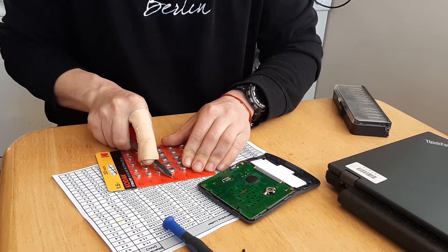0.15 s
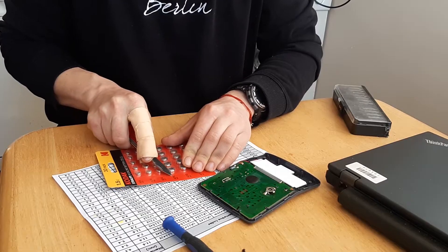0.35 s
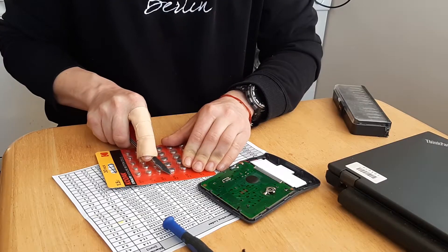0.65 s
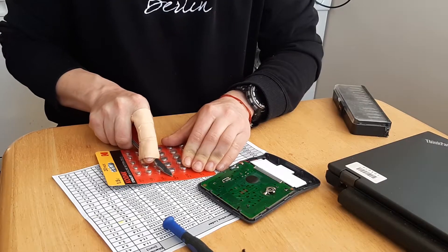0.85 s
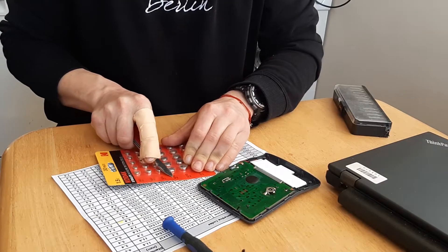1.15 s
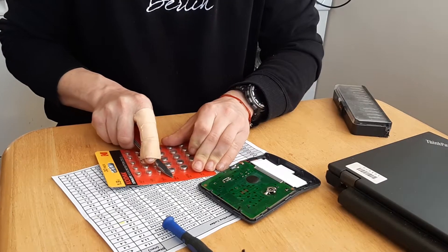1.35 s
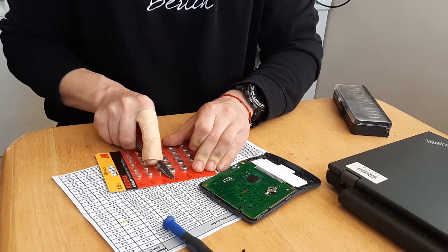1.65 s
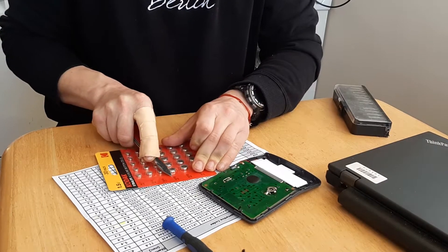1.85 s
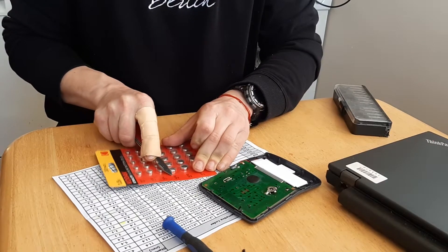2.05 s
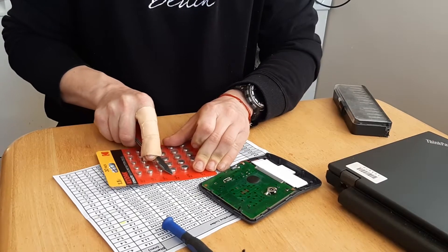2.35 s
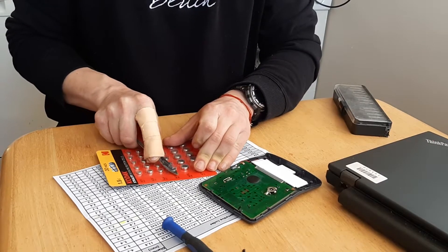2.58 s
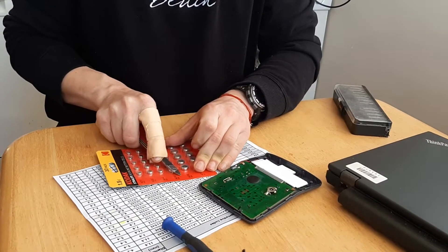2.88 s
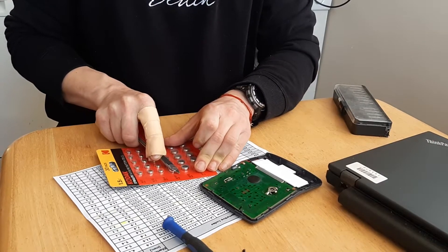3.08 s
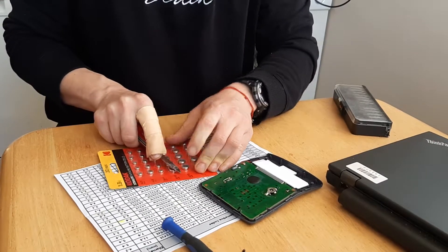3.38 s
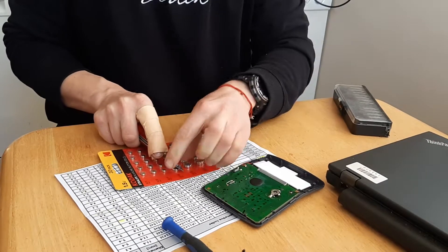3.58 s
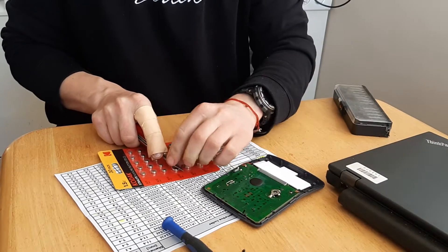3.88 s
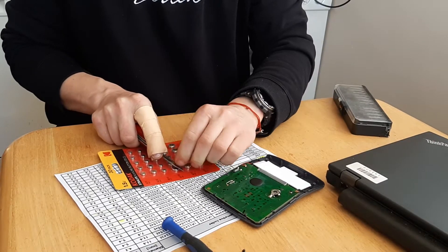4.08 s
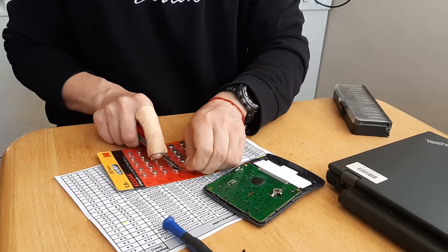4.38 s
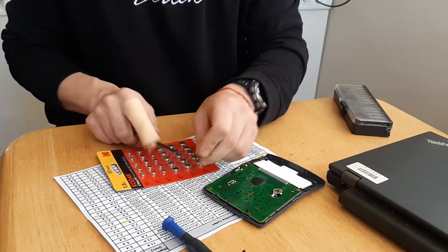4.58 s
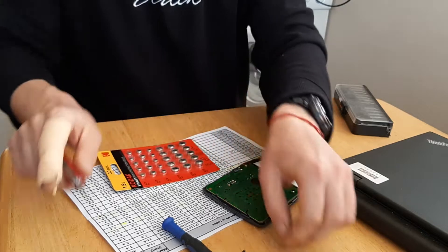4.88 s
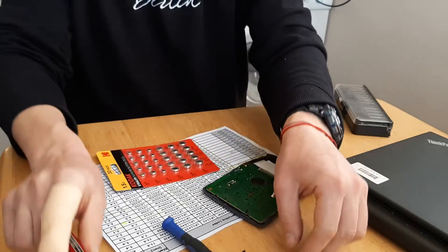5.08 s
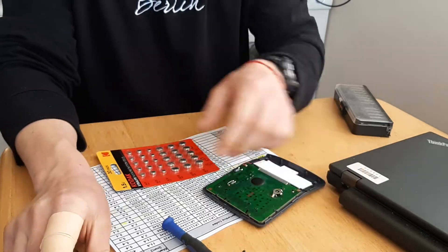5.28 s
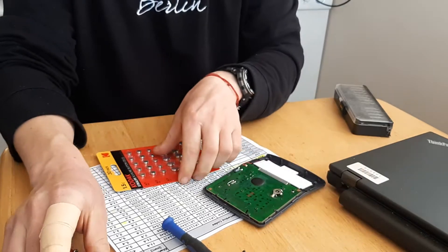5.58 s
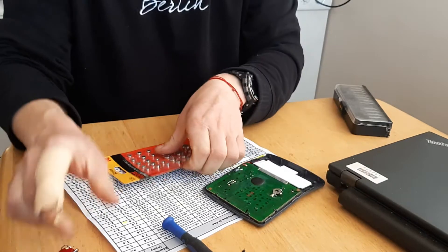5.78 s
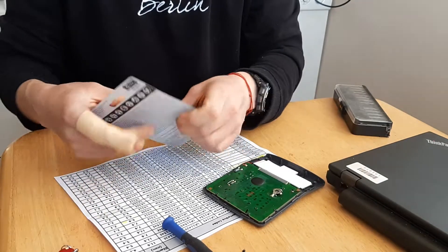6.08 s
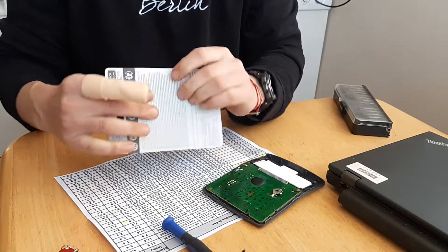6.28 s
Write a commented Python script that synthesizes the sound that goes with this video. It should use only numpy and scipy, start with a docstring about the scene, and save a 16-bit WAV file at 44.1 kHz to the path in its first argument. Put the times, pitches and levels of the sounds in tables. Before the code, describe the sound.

In a bare room, rasping metal on stiff plastic builds to a sharp crack, then a pop, tiny ticks, wooden thumps and a papery drag.

```python
"""A wooden desk in a bare, ringing room, heard by a camera's two microphones from slightly left of centre.
Metal tweezers scratch at a plastic blister card (stick-slip clicks and hiss) until the blister snaps (short coloured
bursts) and a button cell comes free. The cell ticks (brief dying sines), tweezers and hand knock on the desk (dulled
bursts and a humming top), sleeve and card rub and the card slides off its paper (more stick-slip), over room air,
a thin whine and cloth. Table levels are at the source, before the gains of straight path and room."""
import sys
import numpy as np
from scipy import signal
from scipy.fft import rfft, irfft
from scipy.io import wavfile

SR = 44100
rng = np.random.default_rng(int(sys.argv[2]) if len(sys.argv) > 2 else 0)


def log_audio(samples):
    """Write samples as a 16-bit WAV file to the path given in sys.argv[1]."""
    # one column per channel
    frames = np.atleast_2d(samples).T
    # limit to full scale, then quantise
    limited = np.clip(frames, -1, 1)
    pcm = np.round(limited * 32767).astype(np.int16)
    wavfile.write(sys.argv[1], SR, pcm)


N = 283713
TIME = np.arange(N) / SR

FIRM_DB, STROKE_S = -35, .028  # level of a firm stroke, and the sum of its rise and fall time constants
LINGER_DB = 24  # a stroke this much lighter takes twice as long
FIRM_TREBLE_DB, FIRM_BODY_DB, BODY_PER_DB = -1.5, 0, 0.08  # colour of a firm stroke; lighter ones sound thinner


def scrape(peak_s, level_db, swell):
    """One stroke: firm ones are short and full, light ones long and thin."""
    length = STROKE_S * 2 ** ((FIRM_DB - level_db) / LINGER_DB)
    swell = np.clip(swell, .02, .98)
    body_db = FIRM_BODY_DB + BODY_PER_DB * (level_db - FIRM_DB)
    return peak_s, level_db, swell * length, (1 - swell) * length, FIRM_TREBLE_DB, body_db


# Strokes of the tweezer tip on the blister, and at 5.347 a faint rub as sleeve or hand lands:
# peak_s, level_db, swell_share (part of the stroke spent rising, 0-1)
SCRAPES = [(0.004, -37.5, 0.89), (0.32, -58, 0.66), (0.48, -54, 0.68), (0.561, -53, 0.02),
           (0.667, -44.5, 0.71), (0.813, -46.5, 0.44), (0.926, -45.5, 0.18), (0.952, -44, .45),
           (1.1, -36, 0.86), (1.255, -40, 0.43), (1.31, -44.5, .5), (1.375, -42, 0.66), (1.514, -36, .15),
           (1.655, -31.5, 0.26), (1.822, -35, 0.46), (1.958, -35, 0.62), (2.095, -37, 0.77),
           (2.226, -31.5, .25), (2.385, -34, .7), (2.96, -44.5, 0.4), (3.436, -37.5, 0.18),
           (3.475, -45.5, 0.4), (4.202, -54, .02), (4.56, -57.5, .45), (4.811, -64, 0.02),
           (5.347, -58, 0.17)]
# Colour of the scratched plastic, also given to the faint rub: pitch_hz, level_db
BLISTER_COLOUR = [(60, -44), (200, -11), (350, -9.5), (800, -8.5), (1200, -5), (1800, -7.5), (2400, -2),
                  (3500, -0.5), (5000, -2), (6300, -3.5), (7300, -15.5), (10000, -16.5), (13000, -20),
                  (16000, -18.5)]
# The blister crinkles more and more until it gives way
GIVE_S, STRAIN_DB, STRAIN_DB_PER_S = 2.39, -52.5, 5
GRIP_S, GRIP_RISE_S = 0.47, .6  # the tip finds its hold and takes up the strain


def scraping():
    """The tip slips and sticks along the blister, which crinkles under strain; later sleeve or hand rubs faintly."""
    strokes = [scrape(*row) for row in SCRAPES]
    rasp = friction(strokes, BLISTER_COLOUR, slips_per_s=550, spread_db=4, hiss=0.17)
    grip = np.clip((TIME - GRIP_S) / GRIP_RISE_S, 0, 1) * (TIME < GIVE_S)
    strain = grip * amp(STRAIN_DB + STRAIN_DB_PER_S * (TIME - GIVE_S))
    crinkle = ring(slips(N, per_s=98, spread_db=4.0) * strain, colour(BLISTER_COLOUR))
    return heard(rasp + crinkle, -3.4, 0.71)


# Plastic snapping: start_s, level_db (energy), room_db (room against straight path)
SNAPS = [(0.949, -20.5, 0.5), (1.095, -17, 8), (1.513, -19.5, 4), (1.663, -13.5, 8.5), (2.207, -17, -2.5),
         (2.256, -22.5, -1), (2.373, -20.5, -1.5), (2.3901, 7.5, 2), (2.3915, -8.5, 1), (2.3987, -2.5, 2),
         (2.401, 0.5, 6.5), (2.4083, -4, -2.5), (2.5, -20, -24), (2.635, -31, -5), (2.724, -42, -11),
         (2.957, -18, -5), (3.63, -33.5, 0.5)]
# Colour of the snapping plastic: pitch_hz, level_db
SNAP_COLOUR = [(60, -33), (300, -17), (600, -13), (1900, -10), (2600, 0), (3300, -2), (4800, -.5),
               (6100, -5), (7400, -14), (9500, -11), (13300, -8), (16000, -10)]
# The cell springing out of its pocket: start_s, level_db (energy), room_db
POPS = [(4.3575, 3, 1.5), (4.368, -12, -2), (4.377, -24, 5)]
# Colour of the emptied pocket: pitch_hz, level_db
POCKET_COLOUR = [(60, -28), (300, -13), (550, -7), (900, -3), (1300, -12), (1900, -14), (3000, -4),
                 (4300, 1), (5900, 1), (7400, -15), (16000, -12)]
BRIGHT_PER_DB = .5  # dB of treble gained for each dB of snap energy


def snapping(snaps, spectrum, treble_db):
    """The blister buckles and tears, brighter the harder; snaps that face away are heard mostly through the room."""
    near, far = np.zeros(N), np.zeros(N)
    for start_s, level_db, room_db in snaps:
        plastic = colour(spectrum, treble_db + BRIGHT_PER_DB * level_db)
        snap = amp(level_db) * signal.fftconvolve(contact(fall=.001, grit=.5), plastic)
        add(near, start_s, snap)
        add(far, start_s, amp(room_db) * snap)
    return direct(near) + room(far)


# Hands bearing down hard on the card: peak_s, level_db
PUSHES = [(0.024, -46.5), (1.29, -48), (1.61, -45), (1.833, -43), (2.104, -37), (2.416, -44), (3.98, -62),
          (4.371, -49.5), (5.35, -53.5), (5.6, -45)]
# Colour of the dull thud: pitch_hz, level_db
THUD_COLOUR = [(25, -29.5), (50, -18.5), (75, -4), (130, 1), (190, -1), (260, -19), (450, -19.5),
               (900, -38.5), (3000, -96)]
PUSH_RISE_S, PUSH_FALL_S = .018, .027
LEAN_DB, LEAN_LAG_S = -21, .012  # every stroke in SCRAPES also leans on card or desk, this much weaker and later


def pushing():
    """Low noise thuds as the hands bear down on card and desk, and a light one under every stroke in SCRAPES."""
    out = np.zeros(N)
    leans = [(peak_s + LEAN_LAG_S, level_db + LEAN_DB) for peak_s, level_db, _ in SCRAPES]
    for peak_s, level_db in list(PUSHES) + leans:
        start_s, force = stroke(peak_s, PUSH_RISE_S, PUSH_FALL_S)
        thud = ring(rng.standard_normal(len(force)), colour(THUD_COLOUR))
        add(out, start_s, amp(level_db) * under(force, thud))
    return heard(out, 0.0064, 0.067)


# The button cell touching tweezers and desk: start_s, level_db (energy)
TICKS = [(4.5239, -19.5), (4.9106, -31), (4.9183, -25), (4.9621, -35.5), (4.971, -24), (5.014, -31.5)]
# Ringing modes of the cell: pitch_hz, level_db, t60_s
CELL_MODES = [(3330, 0, .012), (5700, 0, .0025), (11400, 1, .0012), (13500, -4, .001)]


def ticking():
    """The small metal cell rings very briefly at each touch."""
    force, body = np.zeros(N), modes(CELL_MODES)
    for start_s, level_db in TICKS:
        add(force, start_s, amp(level_db) * contact(fall=0.00083, grit=0.55))
    ringing = ring(force, body / np.linalg.norm(body))
    return heard(ringing + 0.052 * force, 0, -0.5)


# Blows on the desk: start_s, level_db (energy), corner_hz (higher is harder), ring_db (drive of the desk top)
KNOCKS = [(0.003, -14, 550, -46), (0.017, -19, 490, -39.5), (0.431, -37.5, 400, -53.5),
          (0.749, -40, 400, -54), (4.358, -11.5, 2500, -58), (5.347, -37, 2513, -51),
          (5.41, -7.5, 900, -33), (5.443, -9.5, 700, -48), (5.497, -18, 500, -38.5),
          (5.563, -9.5, 5000, -49), (5.571, 1, 2800, -26.5), (5.578, -4, 1500, -31.5),
          (5.605, 0.5, 900, -25), (5.626, -10, 590, -52)]
# Colour of the clack, before the corner dulls it: pitch_hz, level_db
WOOD_COLOUR = [(40, -32), (130, -7), (330, -5), (470, -1), (700, -3), (900, 0), (1500, 1), (2200, 0),
               (3000, -6), (5500, -11), (7400, -22), (16000, -12)]
# Humming modes of the desk top: pitch_hz, level_db, t60_s
DESK_MODES = [(184.5, -1, 0.6), (254, -10.5, 0.48), (377, -55, 0.13), (512, -53, 0.073), (573, -11, 0.3),
              (611.3, -9.5, 0.25), (694, -12.5, 0.29), (902, -13, 0.36), (1200, -46, 0.15),
              (1524, -16.5, 0.26)]


def knocking():
    """Each blow gives a wooden clack and sets the desk top humming."""
    clack, push = np.zeros(N), np.zeros(N)
    for start_s, level_db, corner_hz, ring_db in KNOCKS:
        wood = colour(WOOD_COLOUR, corner_hz=corner_hz)
        add(clack, start_s, amp(level_db) * signal.fftconvolve(contact(fall=0.0013, grit=0.99), wood))
        add(push, start_s, amp([ring_db]))  # a single-sample push
    onset = 1 - np.exp(-TIME[:SR] / 0.0036)
    hum = ring(push, modes(DESK_MODES) * onset)
    return heard(clack, -3.5, 0.48) + hum * amp([[-1.2], [.6]])


# Tweezers clattering on card and desk: start_s, level_db (energy)
CLATTER = [(0.004, -14.5), (5.4096, -5), (5.414, -22), (5.437, -35), (5.465, -25), (5.57, -10)]
# Colour of the tweezers: pitch_hz, level_db
TWEEZERS_COLOUR = [(100, -28), (900, -6), (1800, -9), (2600, 0), (3500, -3), (4700, 1), (5900, -2),
                   (7400, -27), (16000, -23)]


def clattering():
    """The tweezers strike card and desk: gritty contacts coloured by the metal."""
    force = np.zeros(N)
    for start_s, level_db in CLATTER:
        add(force, start_s, amp(level_db) * contact(fall=0.0024, grit=0.7))
    return heard(ring(force, colour(TWEEZERS_COLOUR)), -0.7, 2.6)


# Light rubs of sleeve and card: a sleeve rustle, soft card taps, then card edges catching on the paper:
# peak_s, level_db, treble_db
RUBS = [(4.695, -57, 0), (5.864, -42, -7), (5.941, -42.5, -7), (5.96, -50.5, -7), (6.105, -29.5, -1),
        (6.157, -30, -3), (6.272, -26.5, -1), (6.315, -34.5, 2), (6.35, -34, -5), (6.415, -33, -13)]
# Colour shared by the rubs and the drag: pitch_hz, level_db
CARD_COLOUR = [(80, -29), (200, -19), (330, -2), (480, -5), (650, -3), (1150, -0.5), (1600, -2.5),
               (3100, -1.5), (5000, -4.5), (6300, -7), (7400, -20), (16000, -20)]
RUB_RISE_S, RUB_FALL_S, RUB_BODY_DB = .003, .013, 3.5
DRAG_S, DRAG_RISE_S, DRAG_FALL_S, DRAG_DB = 6.125, .012, .2, -36  # the long pull of the card off the paper


def sliding():
    """A sleeve rustles, the card taps softly, then catches on the paper and is dragged off it: all as stick-slip."""
    strokes = [(peak_s, level_db, RUB_RISE_S, RUB_FALL_S, treble_db, RUB_BODY_DB)
               for peak_s, level_db, treble_db in RUBS]
    strokes.append((DRAG_S, DRAG_DB, DRAG_RISE_S, DRAG_FALL_S, 0, 0))
    return heard(friction(strokes, CARD_COLOUR, slips_per_s=800, spread_db=4.5, hiss=0.22), 1.0, 1.0)


# Sleeves brushing as the arms move: peak_s, level_db, swell_s (time constant of rise and of fall)
BRUSHES = [(1.2, -67.5, 1), (3.98, -70.5, 0.22), (4.27, -64, 0.073), (5.25, -65.5, 0.25)]
# Colour of the cloth: pitch_hz, level_db
CLOTH_COLOUR = [(60, -20), (185, 0), (280, -10), (620, -8), (850, -12), (1180, -7), (1500, -22),
                (4000, -30), (8000, -45)]


def brushing():
    """Cloth noise swells and fades with each arm movement, heard only through the room."""
    motion = sum(amp(level_db) * np.exp(-abs(TIME - peak_s) / swell_s) for peak_s, level_db, swell_s in BRUSHES)
    return room(ring(rng.standard_normal(N), colour(CLOTH_COLOUR)) * motion)


WHINE_HZ, WHINE_DB, WHINE_WIDTH_HZ = 2423, -86, 10


def whining():
    """A thin steady sine whose level wavers at random, separately at each microphone."""
    smoothing = [1, -np.exp(-np.pi * WHINE_WIDTH_HZ / SR)]
    waver = evened(signal.lfilter([1], smoothing, rng.standard_normal((2, N))))
    return amp(WHINE_DB) * evened((1 + 0.41 * waver) * np.sin(2 * np.pi * WHINE_HZ * TIME))


# Colour of the still room air: pitch_hz, level_db
AIR_COLOUR = [(25, -9.5), (130, 5.5), (200, -3), (300, -11), (600, -12), (1200, -14.5), (1800, -20.5),
              (5500, -12.5), (7500, -24.5), (10000, -16), (16000, -18)]
AIR_DB = -71


def room_air():
    """Steady coloured noise reaching the microphones from all sides."""
    noise = [ring(rng.standard_normal(N), colour(AIR_COLOUR)) for _ in range(2)]
    return amp(AIR_DB) * diffuse(np.array(noise))


MIC_GAP_M = 0.18


def diffuse(pair):
    """Sound from all sides: the two microphones agree only on long waves."""
    a, b = rfft(pair)
    same = np.sinc(2 * np.fft.rfftfreq(pair.shape[1], 1 / SR) * MIC_GAP_M / 343)  # 343 m/s
    return irfft([a, same * a + np.sqrt(1 - same ** 2) * b], pair.shape[1])


LAG_SAMPLES = 4  # the right microphone hears the desk this much later


def direct(x, right_db=-3.5):
    """The straight path reaches the left microphone first, and louder."""
    return np.array([x, amp(right_db) * np.pad(x, (LAG_SAMPLES, 0))[:N]])


# Decay of the bare room: pitch_hz, t60_s
ROOM_DECAY = [(100, .37), (400, .41), (1000, .43), (2800, .45), (5000, .44), (8000, .37), (15000, .28)]


def room(x, build=0.0012, density=.25):
    """Reflections swell within milliseconds and grow denser, and each band dies at its own speed."""
    crowding = density + 4 * TIME[:SR]
    taps = rng.standard_normal((2, SR)) * (rng.random(SR) < crowding)
    hz, t, bands = signal.stft(diffuse(taps), SR, nperseg=256)
    decay = amp(-60 * t / read(ROOM_DECAY, hz)[:, None])
    tail = signal.istft(bands * decay, SR, nperseg=256)[1][:, :SR]
    # Sparse early taps are raised to keep the level even
    tail = tail * (1 - np.exp(-TIME[:SR] / build)) / np.sqrt(np.minimum(crowding, 1))
    return signal.oaconvolve(x[None], tail / np.linalg.norm(tail[0]), axes=1)[:, :N]


def heard(x, direct_db, room_db):
    """Straight path plus room."""
    return amp(direct_db) * direct(x) + amp(room_db) * room(x)


def friction(strokes, spectrum, slips_per_s, spread_db, hiss):
    """Slips over a fine hiss, under each stroke (peak_s, level_db, rise_s, fall_s, treble_db, body_db)."""
    out = np.zeros(N)
    for peak_s, level_db, rise_s, fall_s, treble_db, body_db in strokes:
        start_s, force = stroke(peak_s, rise_s, fall_s)
        drive = slips(len(force), slips_per_s, spread_db) + hiss * rng.standard_normal(len(force))
        rub = signal.fftconvolve(under(force, drive), colour(spectrum, treble_db, body_db))
        add(out, start_s, amp(level_db) * rub)
    return out


def slips(size, per_s, spread_db):
    """Stick and slip: tiny clicks of uneven size and sign, rms 1."""
    height = amp(spread_db * np.minimum(rng.exponential(1, size), 3)) * rng.choice([-1, 1], size)
    return evened(height * (rng.random(size) < per_s / SR))


def stroke(peak_s, rise_s, fall_s):
    """Start time and force of a stroke that swells exponentially up to its peak and lets go."""
    t = np.arange(max(peak_s - 5 * rise_s, 0), peak_s + 5 * fall_s, 1 / SR) - peak_s
    return peak_s + t[0], np.exp(np.minimum(t / rise_s, -t / fall_s))


def under(force, drive):
    """Shapes a random drive by a force, keeping the energy of the force."""
    return evened(force * drive) * np.sqrt(np.mean(force ** 2))


def contact(fall, grit):
    """One blow of energy 1: a sharp push, then a moment of chatter."""
    t = TIME[:SR // 20]
    chatter = rng.standard_normal(len(t)) * np.exp(-t / fall)
    force = grit * chatter / np.linalg.norm(chatter)
    force[0] = 1
    return force / np.linalg.norm(force)


def modes(table):
    """Sum of dying sines."""
    t = TIME[:SR]
    return sum(amp(level_db - 60 * t / t60_s) * np.sin(2 * np.pi * pitch_hz * t)
               for pitch_hz, level_db, t60_s in table)


def colour(points, treble_db=0, body_db=0, corner_hz=None, size=4096):
    """Causal response of energy 1 with the given spectrum, shelved at both ends or dulled above a corner."""
    hz = abs(np.fft.fftfreq(size, 1 / SR))
    treble = treble_db / (1 + (7000 / (hz + 1)) ** 6)
    body = body_db / (1 + (hz / 1600) ** 4)
    db = read(points, hz) + treble + body
    if corner_hz:
        db = db - 10 * np.log10(1 + (hz / corner_hz) ** 2)
    log_gain = np.log(amp(np.maximum(db, -100)))
    minimum_phase = np.exp(signal.hilbert(log_gain).conj())
    response = np.fft.ifft(minimum_phase).real[:size // 2]
    return response / np.linalg.norm(response)


def ring(x, response):
    """Plays x through a response."""
    return signal.oaconvolve(x, response)[:len(x)]


def read(points, hz):
    """Joins (pitch_hz, value) points on a log-frequency axis."""
    f, value = np.transpose(points)
    return np.interp(np.log(hz + 1), np.log(f + 1), value)


def amp(db):
    """Decibels to gain."""
    return 10 ** (np.asarray(db) / 20)


def evened(x):
    """Scales to rms 1."""
    return x / np.sqrt(np.mean(x ** 2) + 1e-20)


def add(mix, start_s, sound):
    """Mixes a sound in at its start time."""
    part = mix[max(round(start_s * SR), 0):][:len(sound)]
    part += sound[:len(part)]


def scene():
    """Everything at the desk and the room behind it, slightly left of centre."""
    pops = snapping(POPS, POCKET_COLOUR, treble_db=4)
    prying = scraping() + snapping(SNAPS, SNAP_COLOUR, treble_db=0.0) + pops + pushing()
    clearing = ticking() + knocking() + clattering() + sliding()
    background = brushing() + whining() + room_air()
    return (prying + clearing + background) * amp([[.25], [-.25]])


EDGE_HZ = 16150


def record(dry, ceiling=1.0):
    """The sharpest peaks are rounded off; then the camera's band limit removes the highest treble."""
    rounded = ceiling * np.tanh(dry / ceiling)
    lowpass = signal.firwin(255, EDGE_HZ, window=("kaiser", 9), fs=SR)
    return signal.oaconvolve(rounded, lowpass[None], "same")


dry = scene()
out = record(dry)
log_audio(out)
```